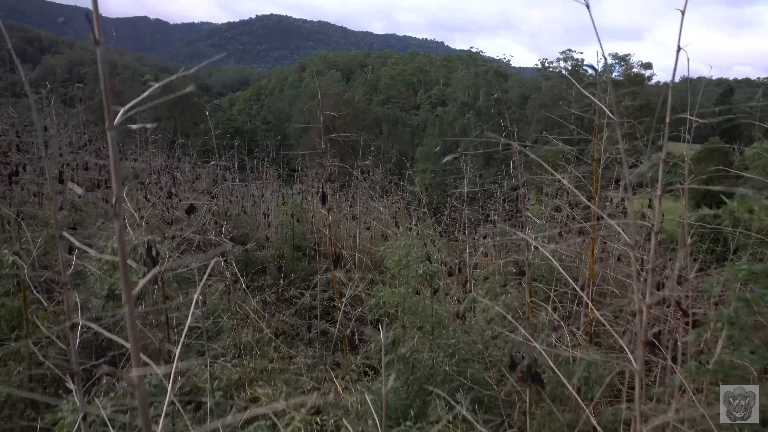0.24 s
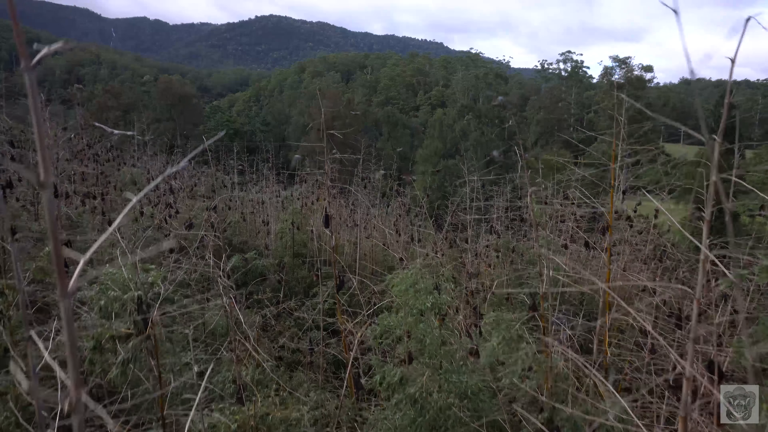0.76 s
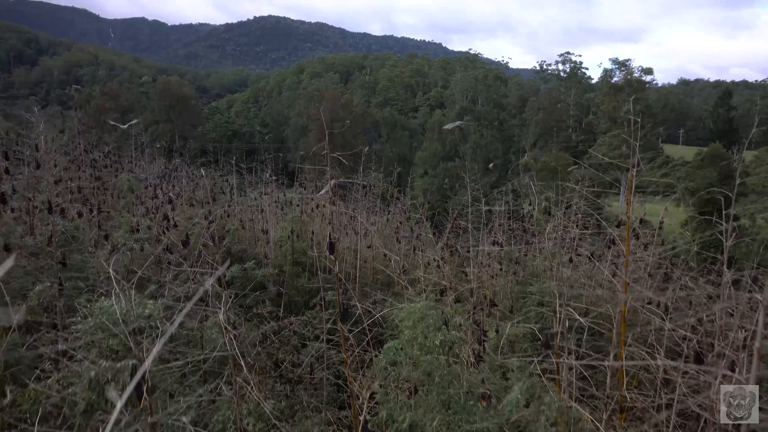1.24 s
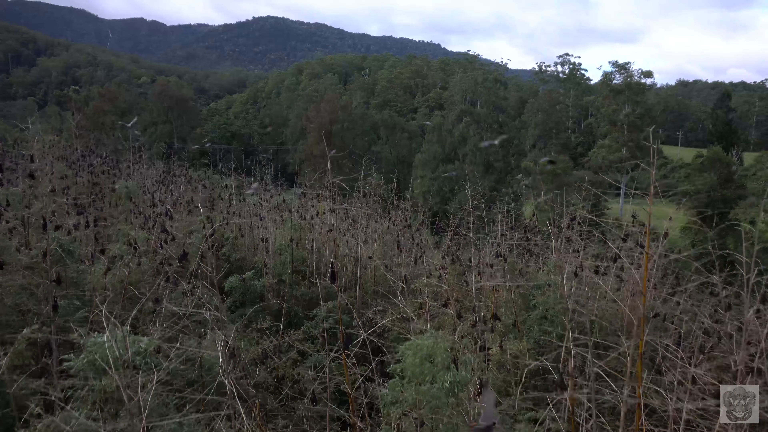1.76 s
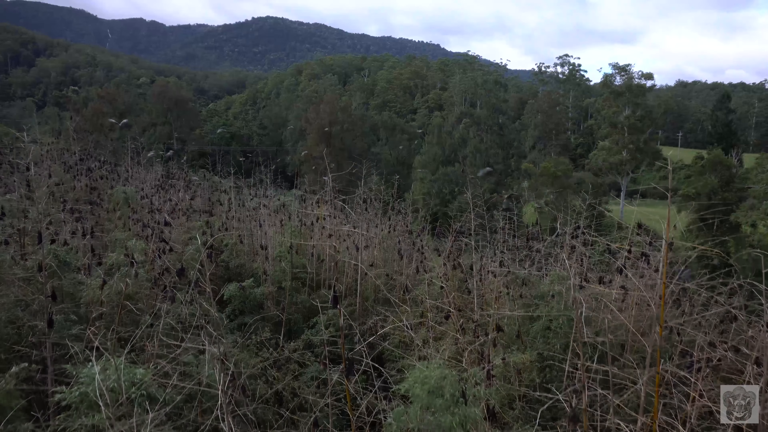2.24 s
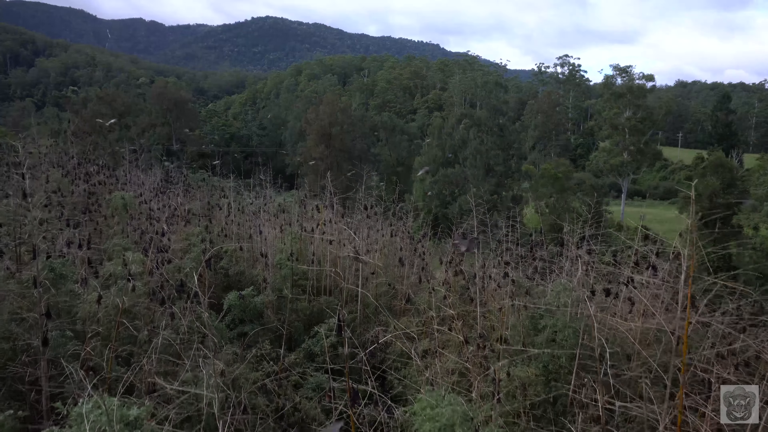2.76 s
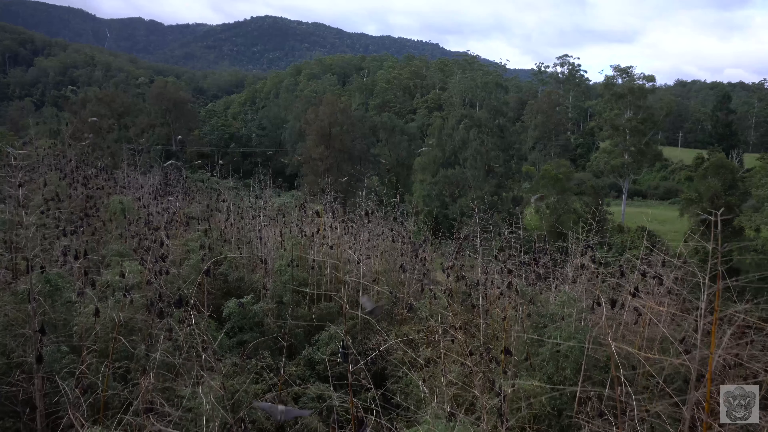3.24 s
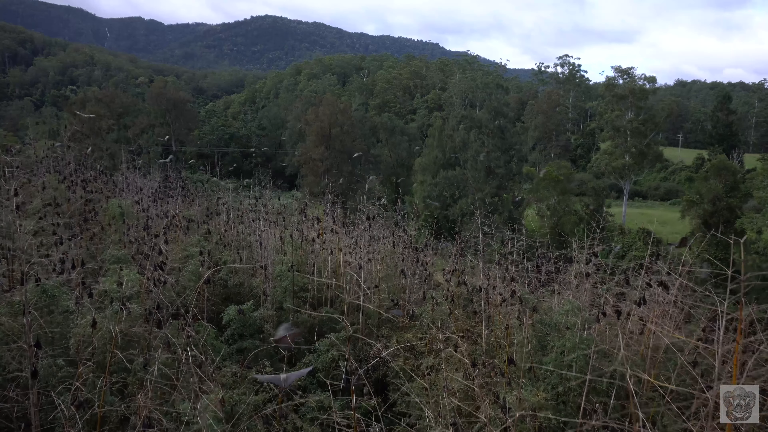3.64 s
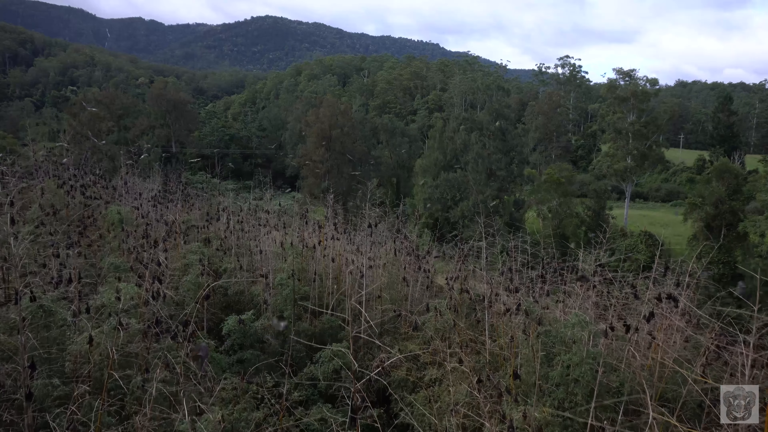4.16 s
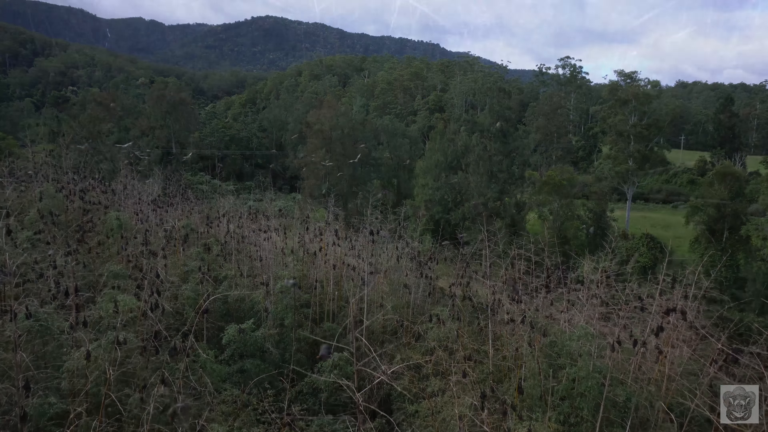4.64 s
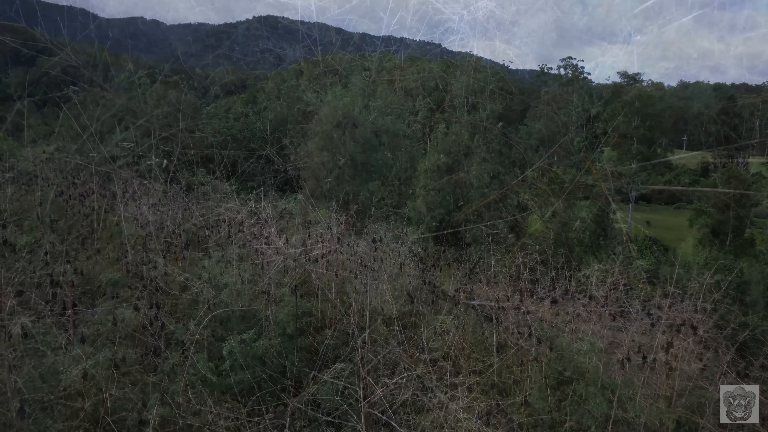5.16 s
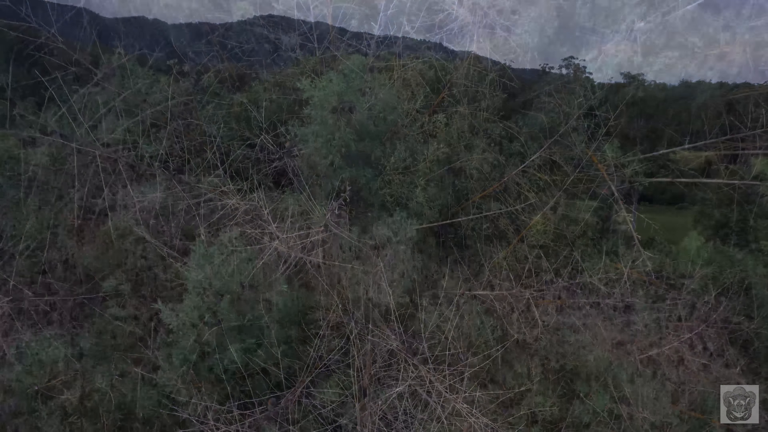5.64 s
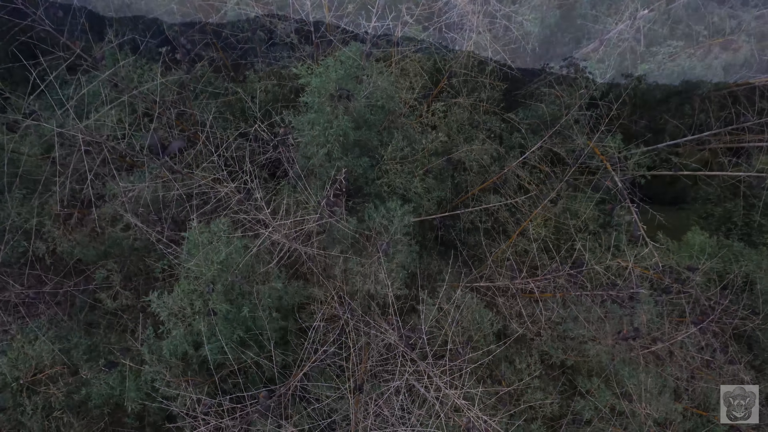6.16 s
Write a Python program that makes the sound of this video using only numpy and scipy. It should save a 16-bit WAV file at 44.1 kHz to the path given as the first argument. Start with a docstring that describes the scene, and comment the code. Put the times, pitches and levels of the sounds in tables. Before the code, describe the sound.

Hundreds of roosting bats shriek and whistle over one another on a wooded hillside, fading after four seconds, then swelling slightly.

```python
"""On a hillside of bare trees, a large colony of flying foxes squabbles. Hundreds of pitched calls, coloured by
throat resonances, merge into a shrill wash over filtered noise. Nearer whistles, wails, squeals, screeches,
buzzes, chirps and yelps stand out, with softer honks and hoots. Trunks scatter the calls as decaying noise
echoes, over a faint rumble; from about 4.5 s the whole sound drops away, then partly returns near the end."""
import sys
import numpy as np
from scipy import signal
from scipy.fft import rfft, irfft, next_fast_len
from scipy.io import wavfile
from scipy.ndimage import uniform_filter1d

SR = 44100
rng = np.random.default_rng(int(sys.argv[2]) if len(sys.argv) > 2 else 0)


def put_to_file(sound):
    """Save the sound as 16-bit audio at rate SR, in the file named by the first command-line argument."""
    columns = np.atleast_2d(sound).T  # one column per channel
    safe = np.clip(columns, -1, 1)
    whole_steps = np.round(safe * 32767)
    wavfile.write(sys.argv[1], SR, whole_steps.astype(np.int16))


N = 282681
FREQS = np.arange(N // 2 + 1) * SR / N
FFT_SIZE = next_fast_len(N, True)
TOP_HZ = 15700  # upper limit of the harmonics and of the microphone


def undb(db):
    """Logarithmic level: decibels to amplitude gain."""
    return 10 ** (np.asarray(db) / 20)


def unit(x):
    """Normalization: scale to an rms of 1."""
    return x / np.sqrt(np.mean(x ** 2) + 1e-18)


def curve(table, column):
    """Linear interpolation: one column of a time table at every sample."""
    rows = np.array(table)
    return np.interp(np.arange(N) / SR, rows[:, 0], rows[:, column])


def over_freqs(points):
    """Logarithmic frequency scale: join (f/Hz, value) points over the spectrum."""
    hz, value = np.transpose(points)
    return np.interp(np.log(FREQS + 1), np.log(hz), value)


def colour(x, points):
    """Spectral shaping: flatten the smoothed spectrum, then impose the points, at rms 1."""
    spectrum = rfft(x)
    power = uniform_filter1d(np.mean(np.abs(spectrum) ** 2, axis=0), size=2001)
    flat = spectrum / np.sqrt(np.abs(power) + 1e-9)
    return unit(irfft(flat * undb(over_freqs(points)), N))


def below(x, hz):
    """Low-pass filtering: a steep, zero-phase roll-off."""
    return irfft(rfft(x) / (1 + (FREQS / hz) ** 12), N)


def wander(n, rate):
    """Random modulation: normal random values joined by lines, rate of them a second."""
    place = np.arange(n) * rate / SR
    knots = rng.standard_normal(n // 8 + 2)
    return np.interp(place, np.arange(len(knots)), knots)


def add(track, start, sound):
    """Superposition: mix a sound into a track from a start time in seconds."""
    i = int(start * SR)
    first, last = max(i, 0), min(i + len(sound), N)
    if last > first:
        track[first:last] += sound[first - i:last - i]


def cry(length, first_hz, last_hz, arch, throat_hz, rough,
        throat_width=0.17, jitter=0.134, quaver=0.0054, flutter_db=4):
    """Source and filter: harmonics of an arched pitch pass a throat resonance; jitter tears them to a rasp."""
    n = max(int(length * SR), 64)
    u = np.linspace(0, 1, n)
    pitch = (first_hz + (last_hz - first_hz) * u) * (1 + arch * np.sin(np.pi * u))
    unsteady = 1 + quaver * wander(n, 111.0) + jitter * rough * wander(n, 1800)
    phase = 2 * np.pi * np.cumsum(pitch * unsteady) / SR
    centre_hz = pitch.mean()
    tone = 0
    for k in range(1, int(TOP_HZ / centre_hz) + 1):
        detune = k * centre_hz / throat_hz - throat_hz / (k * centre_hz)
        resonance = 1 / np.hypot(1, detune / throat_width)
        tone = tone + np.sin((k * phase).astype(np.float32)) * resonance
    # the voice comes on quickly, holds and stops; rougher calls shake more in level
    swell = np.abs(np.sin(np.pi * u)) ** 0.2
    flutter = undb(flutter_db * np.sqrt(abs(rough)) * wander(n, 171))
    return unit(tone * swell * flutter)


def rattle(call, rate, depth):
    """Amplitude modulation: shape a call into quick pulses, rate of them a second."""
    pulses = 1 - depth * np.cos(2 * np.pi * rate * np.arange(len(call)) / SR)
    return unit(call * pulses)


def trees(x, wet_db, t60):
    """Diffuse scattering: direct sound plus trunk and slope echoes, different at each ear."""
    t = np.arange(SR // 2) / SR
    echoes = rng.standard_normal((2, len(t))) * np.exp(-np.log(1000) * t / t60)
    echoes /= np.sqrt(np.sum(echoes ** 2, axis=1, keepdims=True))
    wet = undb(wet_db)
    scattered = signal.fftconvolve(x[None], echoes, axes=1)[:, :N]
    return (x + wet * scattered) / np.hypot(1, wet)


def grove(count, lead_s=.15, glide_share=.25, arch_share=.1, spread_db=2.5):
    """Superposed voices: bats take turns in short bouts; low ones are rougher, high ones cleaner."""
    out = np.zeros(N)
    traits = rng.random((count, 10))
    for turn, (when, size, pitch, glide, bend, throat, rasp, near, bout, pace) in enumerate(traits):
        # the squabble is already under way at the start
        start = (turn + when) / count * (N / SR + lead_s) - lead_s
        length = .018 * 4 ** size
        hz = 1400 * 2.7 ** pitch
        last_hz = hz * (1 + glide_share * (glide - .5))
        throat_hz = max(hz, 2700 * 2.93 ** (throat ** 2))
        rough = .14 + .6 * rasp * (1 - .5 * pitch)
        pulses_per_s = np.interp(pace, [0, 1], [45, 170])
        # shorter syllables come in longer bouts
        for k in range(1 + int(5 * bout * (1 - size))):
            call = cry(length, hz, last_hz, arch_share * bend, throat_hz, rough, flutter_db=4)
            call = rattle(call, pulses_per_s, rasp)
            add(out, start + k * length * 1.7, call * undb(spread_db * near))
    return trees(out, wet_db=-1, t60=.25)


# long-term spectrum of the massed voices: f/Hz, relative spectral density level/dB
VOICE_SPECTRUM = [(300, -55), (800, -24), (1100, -22), (1620, -21), (2150, -10), (2600, -7.5), (2950, -2),
                  (3220, -1), (3400, 1), (3750, 0), (4400, 0), (5050, -3), (5350, -3.5), (5900, -8),
                  (6500, -11), (7200, -13), (7700, -14.5), (8800, -18), (10100, -20.5), (11000, -26.5),
                  (12000, -27.5), (15500, -43.5)]


def crowd(even_s=.085):
    """Level compression by band: each register is held even, leaving the quick grain of the calls."""
    spectrum = rfft(colour(grove(count=860), VOICE_SPECTRUM), FFT_SIZE)
    band = np.digitize(np.arange(FFT_SIZE // 2 + 1) * SR / FFT_SIZE, np.geomspace(1500, 11000, num=11))
    out = 0
    for k in np.unique(band):
        x = irfft(spectrum * (band == k), FFT_SIZE)[:, :N]
        power = np.mean(x ** 2, axis=0)
        local_power = uniform_filter1d(power, int(even_s * SR)) + 1e-12
        out = out + x * np.sqrt(power.mean() / local_power)
    return out


def far_wash(shared=.6, flicker_db=.7):
    """Partly coherent noise: the farthest voices blur to a hiss whose bands swell on their own."""
    noise = rng.standard_normal((2, N)) + shared * rng.standard_normal(N)
    spectrum = rfft(noise, FFT_SIZE)
    band = np.digitize(np.arange(FFT_SIZE // 2 + 1) * SR / FFT_SIZE, np.geomspace(900, 11000, num=13))
    out = 0
    for k in np.unique(band):
        hiss = irfft(spectrum * (band == k), FFT_SIZE)[:, :N]
        out = out + hiss * undb(flicker_db * wander(N, 54))
    return out


# swelling of the colony, before trims and smoothing: t/s, main din level/dB, shrill treble level/dB
DIN_LEVELS = [(0.0, -25, -37.5), (0.2, -28.5, -37.5), (0.31, -25, -35.5), (0.39, -24, -33),
              (0.44, -26.5, -35), (0.62, -27, -33.5), (0.76, -26.5, -37), (0.87, -27.5, -35),
              (1.05, -26.5, -37), (1.18, -26.5, -37), (1.65, -28, -33.5), (1.75, -29, -37.5),
              (2.11, -28, -33), (2.2, -29.5, -41.5), (2.42, -27, -36.5), (2.97, -28, -38), (3.17, -31, -40),
              (3.45, -28.5, -37), (3.66, -29, -35.5), (3.87, -31, -38), (3.96, -27.5, -36),
              (4.1, -29, -41.5), (4.28, -29, -36.5), (4.48, -31.5, -43.5), (4.76, -34.5, -42.5),
              (5.16, -37.5, -45), (5.27, -42.5, -51.5), (5.52, -43.5, -47.5), (5.74, -42.5, -53),
              (5.9, -46.5, -54.5), (5.97, -40, -47.5), (6.25, -37.5, -45), (6.3, -37.5, -41.5),
              (6.41, -38.5, -42)]
# swelling of the deep squawks, before trim and smoothing: t/s, level/dB
SQUAWK_LEVELS = [(0, -35.5), (0.3, -34.5), (0.85, -33.5), (1.05, -35), (1.9, -35.5), (2.15, -36),
                 (3.1, -36.5), (3.6, -36), (4.25, -36), (4.5, -38.5), (4.85, -43), (5.2, -46),
                 (5.35, -50.5), (5.8, -52), (6.1, -51), (6.41, -45.5)]


def colony(squawk_hz=2850, treble_hz=6300, squawk_db=-1.0, din_db=-2.5, treble_db=-1.9, smooth_s=0.059):
    """Band splitting: squawks, main din and shrill top of crowd and wash each follow a level curve."""
    wash = undb(-3) * colour(far_wash(), VOICE_SPECTRUM)
    voices = colour(crowd(), VOICE_SPECTRUM) + wash
    low, body = below(voices, squawk_hz), below(voices, treble_hz)
    registers = [(low, curve(SQUAWK_LEVELS, column=1) + squawk_db),
                 (body - low, curve(DIN_LEVELS, column=1) + din_db),
                 (voices - body, curve(DIN_LEVELS, column=2) + treble_db)]
    out = 0
    for x, db in registers:
        # the level curves are smoothed, so the din rises and falls without jerks
        smooth_db = uniform_filter1d(db, int(smooth_s * SR) + 1)
        out = out + x / np.std(x.mean(axis=0)) * undb(smooth_db)
    return out


# long-term spectrum of the rumble: f/Hz, relative spectral density level/dB
RUMBLE_SPECTRUM = [(22, -36), (36, -15), (52, -1.5), (100, -1), (170, -4), (300, -9), (460, -4),
                   (680, -9.5), (1400, -12), (4000, -28.5)]
# level of the rumble before trim: t/s, level/dB
RUMBLE_LEVELS = [(0, -48), (4.25, -48.5), (5.75, -66.5), (6.41, -57.5)]


def open_air(alike_hz=190, trim_db=0.8):
    """Interaural coherence: a faint noise rumble, alike at both ears in the bass and diffuse above."""
    own_gain = np.minimum((FREQS / alike_hz) ** 2, 2)
    own = irfft(rfft(rng.standard_normal((2, N))) * own_gain, N)
    rumble = colour(rng.standard_normal(N) + own, RUMBLE_SPECTRUM)
    return rumble * undb(curve(RUMBLE_LEVELS, column=1) + trim_db)


# torn, noisy calls, level before the near-bat mix: start t/s, length t/s, throat resonance f/Hz, level/dB
SCREECH_CALLS = [(0, .22, 2180, -37.5), (.305, 0.074, 9400, -39), (0.838, .029, 4200, -28.5),
                 (.865, 0.071, 2450, -37), (.871, 0.06, 4270, -35), (1.143, .069, 3550, -36),
                 (1.162, 0.046, 4750, -35), (1.347, .07, 9700, -42), (1.812, .14, 7600, -40.5),
                 (1.87, .018, 10800, -39), (2.42, 0.28, 7550, -42), (2.861, .022, 3800, -30.5),
                 (2.862, .018, 7300, -36.5), (2.862, .02, 10800, -42), (2.945, .054, 4080, -35),
                 (3.229, 0.027, 3900, -33), (3.3, .016, 4000, -32.5), (3.93, 0.064, 7600, -39),
                 (4.101, 0.055, 4650, -35.5), (4.219, .13, 2750, -40), (4.308, .04, 9000, -47),
                 (5.129, .057, 4100, -45), (5.133, .055, 2130, -48), (5.14, 0.11, 2480, -54),
                 (5.29, 0.043, 2470, -53), (5.369, .06, 2460, -54), (5.46, .04, 2420, -51),
                 (5.518, .05, 2460, -52), (5.915, .03, 7950, -51), (5.942, .069, 4000, -47)]


def screeches(voice_hz=1264, arch=.035, rough=0.724):
    """Frequency jitter: a low voice forced into a rasp, one harmonic near the throat resonance."""
    out = np.zeros(N)
    for start, length, throat_hz, db in SCREECH_CALLS:
        hz = throat_hz / round(throat_hz / voice_hz)
        add(out, start, undb(db) * cry(length, hz, hz, arch, throat_hz, rough))
    return out


# level before the near-bat mix: start t/s, length t/s, pitch f/Hz, throat resonance f/Hz, level/dB
SQUEAL_CALLS = [(.278, 0.076, 1795, 5370, -34.5), (.575, .055, 1175, 4720, -38),
                (.575, 0.059, 2360, 9460, -42), (.56, .06, 2360, 7100, -43), (1.085, .035, 1655, 4980, -38),
                (1.499, 0.16, 1075, 4300, -38), (1.53, 0.051, 3490, 10450, -48),
                (1.695, 0.096, 3380, 10150, -43), (2.004, 0.047, 2730, 8250, -38),
                (2.36, .05, 2310, 9250, -47.5), (3.735, .06, 3530, 10590, -47),
                (4.295, 0.031, 1460, 4400, -37), (4.85, .25, 1340, 5360, -49),
                (5.015, .06, 1820, 9100, -51), (5.02, .06, 1925, 5770, -49), (5.565, .05, 2000, 8000, -55)]
HELD_ARCH = 0.00623  # share of the pitch, for squeals and buzzes


def squeals(rise=0.0193, rough=0.136):
    """Formant selection: slightly rising notes, heard mainly by the partial at the throat resonance."""
    out = np.zeros(N)
    for start, length, hz, throat_hz, db in SQUEAL_CALLS:
        lift = hz * rise / 2
        add(out, start, undb(db) * cry(length, hz - lift, hz + lift, HELD_ARCH, throat_hz, rough))
    return out


# level before the near-bat mix: start t/s, length t/s, pitch f/Hz, throat resonance f/Hz, level/dB
BUZZ_CALLS = [(.3, 0.069, 371, 8400, -40.5), (.85, .14, 400, 7750, -43), (1.978, .155, 346, 7750, -40)]


def buzzes():
    """Dense harmonic series: a low, wavering voice crowds its partials under a high throat resonance."""
    out = np.zeros(N)
    for start, length, hz, throat_hz, db in BUZZ_CALLS:
        call = cry(length, hz, hz, HELD_ARCH, throat_hz, rough=.04, throat_width=.1, quaver=.012)
        add(out, start, undb(db) * call)
    return out


# hoarse held whistles, level before the near-bat mix: start t/s, length t/s, pitch f/Hz, level/dB
WAIL_CALLS = [(.311, .11, 3360, -36), (.409, 0.13, 3410, -38), (0.591, 0.054, 3400, -35),
              (1.09, .11, 3460, -37), (1.281, 0.16, 3370, -38.5), (1.378, .045, 3080, -37),
              (1.501, 0.16, 3340, -38), (1.64, 0.14, 3470, -39), (1.85, 0.28, 3410, -40.5),
              (3.625, .1, 3600, -36), (3.765, .1, 3550, -35), (3.84, .04, 3200, -37),
              (4.848, .13, 3400, -47), (6.102, 0.16, 3430, -53), (6.355, 0.044, 3560, -43)]
WHISTLE_ARCH = 0.00857  # share of the pitch, for wails and whistles


def wails(throb_per_s=59, throb_depth=.45):
    """Amplitude modulation: strained, throbbing voices keep returning to nearly the same note."""
    out = np.zeros(N)
    for start, length, hz, db in WAIL_CALLS:
        call = cry(length, hz, hz, WHISTLE_ARCH, hz, rough=.15, quaver=.009)
        add(out, start, undb(db) * rattle(call, throb_per_s, throb_depth))
    return out


# nearly pure sliding tones, level before the near-bat mix:
# start t/s, length t/s, first pitch f/Hz, rise in f/(Hz per s), level/dB
WHISTLE_CALLS = [(.44, 0.08, 2800, 600, -38), (.562, .045, 3630, 100, -36.5), (0.662, 0.21, 2400, 152, -39),
                 (.875, .09, 2780, 1400, -32), (0.892, .09, 3300, 300, -37), (.994, 0.07, 3330, 500, -29),
                 (1.602, 0.17, 2900, 500, -42), (2.24, .11, 2950, 301, -44), (2.78, 0.11, 3000, 197, -36.5),
                 (2.82, .09, 3515, 298, -37), (2.904, .018, 8100, -20000, -39.5),
                 (3.04, .016, 8100, -15000, -43), (3.625, 0.28, 2402, 1171, -35),
                 (3.884, 0.054, 2655, 4500, -31), (3.936, .04, 2930, 0, -32.5),
                 (4.193, 0.025, 2810, 900, -27.5), (6.285, .033, 6500, -17000, -43),
                 (6.297, .022, 8300, 10000, -45)]


def whistles():
    """Resonance at the fundamental: the throat favours the lowest partial of a sliding pitch."""
    out = np.zeros(N)
    for start, length, hz, rise, db in WHISTLE_CALLS:
        last_hz = hz + rise * length
        call = cry(length, hz, last_hz, WHISTLE_ARCH, hz, rough=.035, quaver=.005, flutter_db=8)
        add(out, start, undb(db) * call)
    return out


# low calls on one note, level before scattering: start t/s, length t/s, level/dB
HOOT_CALLS = [(.515, .08, -54.5), (.965, .17, -54.5), (1.48, .27, -55.5), (2.25, .062, -53)]


def hoots(hz=475):
    """Resonance at the fundamental: low, unsteady voices all share one note."""
    out = np.zeros(N)
    for start, length, db in HOOT_CALLS:
        add(out, start, undb(db) * cry(length, hz, hz, 0.0187, hz, rough=.45, quaver=.022))
    return out


# soft arched calls, level before scattering:
# start t/s, pitch at the ends f/Hz, arch [share of the pitch], level/dB
HONK_CALLS = [(.535, 1060, 0.037, -45.5), (.98, 978, 0.17, -45), (1.105, 1057, .07, -45),
              (1.465, 1030, .04, -49), (1.745, 970, .07, -51), (2.151, 980, .11, -51),
              (2.255, 1010, .11, -49), (2.468, 983, .08, -48), (3.419, 1023, 0.083, -46),
              (4.04, 950, 0.113, -46), (4.099, 1013, .11, -47), (4.71, 1005, .11, -56),
              (4.96, 935, .08, -57.5), (5.77, 930, .11, -62)]


def honks(length=.075):
    """Frequency modulation: short hoarse voices arch in pitch, the throat tuned to the fundamental."""
    out = np.zeros(N)
    for start, hz, arch, db in HONK_CALLS:
        add(out, start, undb(db) * cry(length, hz, hz, arch, hz, rough=.28, quaver=.014))
    return out


# bouts of quick syllables, level before the near-bat mix:
# start t/s, number of chirps, first pitch f/Hz, level/dB
CHIRP_BOUTS = [(.632, 1, 3660, -38), (2.302, 1, 3420, -40), (2.297, 1, 4400, -42), (2.964, 2, 3330, -40),
               (3.557, 1, 3230, -42), (3.607, 3, 3250, -36.5), (5.45, 1, 3600, -54), (5.49, 2, 4600, -59)]


def chirps(length=0.0317, every_s=.054, rise=0.0533, arch=0.0405, rough=0.093):
    """Formant near the second harmonic: short rising, arched syllables, evenly paced in a bout."""
    out = np.zeros(N)
    for start, count, hz, db in CHIRP_BOUTS:
        for k in range(round(count)):
            call = cry(length, hz, hz * (1 + rise), arch, 2.15 * hz, rough, throat_width=.3)
            add(out, start + k * every_s, undb(db) * call)
    return out


# clean, steeply arched cries, level before the near-bat mix:
# start t/s, length t/s, pitch at the ends f/Hz, level/dB
YELP_CALLS = [(6.26, 0.038, 2900, -48), (6.301, 0.044, 3100, -43.5), (6.347, 0.07, 3110, -44)]


def yelps():
    """Broad resonance: an open-mouthed cry swoops up and back, strongest in its second harmonic."""
    out = np.zeros(N)
    for start, length, hz, db in YELP_CALLS:
        call = cry(length, hz, hz, arch=.18, throat_hz=2 * hz, rough=.03, throat_width=.5)
        add(out, start, undb(db) * call)
    return out


def near_bats(air_hz=11400, near_db=1.5):
    """Direct-sound dominance: the closest voices are almost dry, their very top lost in the air."""
    voices = screeches() + squeals() + buzzes() + wails() + whistles() + chirps() + yelps()
    return undb(near_db) * trees(below(voices, air_hz), wet_db=-11, t60=0.27)


def deep_roost():
    """Reverberant distance: honks and hoots from deeper in the roost carry more scattered sound."""
    return trees(hoots() + honks(), wet_db=-8.0, t60=0.23)


def scene():
    """Superposition: the whole roost in the open air."""
    return colony() + open_air() + near_bats() + deep_roost()


# stereo balance of the microphone: f/Hz, left minus right level/dB
EAR_BALANCE = [(60, 0.5), (200, -1.5), (380, 5.5), (700, 1.5), (1290, 4.5), (2380, 8), (4400, 3.5),
               (8120, 6), (15000, -0.5)]
# phase between the microphone ports: f/Hz, left minus right phase [rad]
EAR_PHASE = [(130, 0), (400, -1.6), (860, -2.2), (1810, -1.4), (2930, -.8), (5430, -.3), (6900, -.8),
             (9000, -.4), (12000, 1.9)]


def record(dry):
    """Interchannel differences: the microphone mostly favours the left, shifts phase and cuts the top."""
    side = np.array([[1], [-1]]) / 2
    ports = undb(side * over_freqs(EAR_BALANCE)) * np.exp(1j * side * over_freqs(EAR_PHASE))
    stereo = irfft(rfft(dry) * ports, N)
    top_cut = signal.ellip(10, .2, 80, TOP_HZ, fs=SR, output="sos")
    return signal.sosfilt(top_cut, stereo)


dry = scene()
out = record(dry)
put_to_file(out)
```